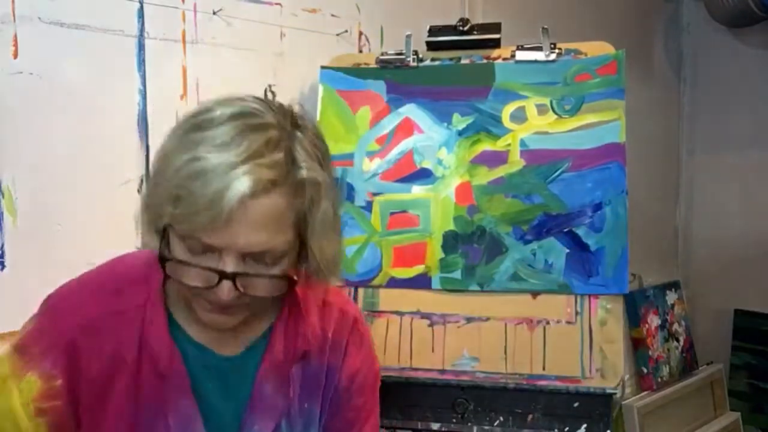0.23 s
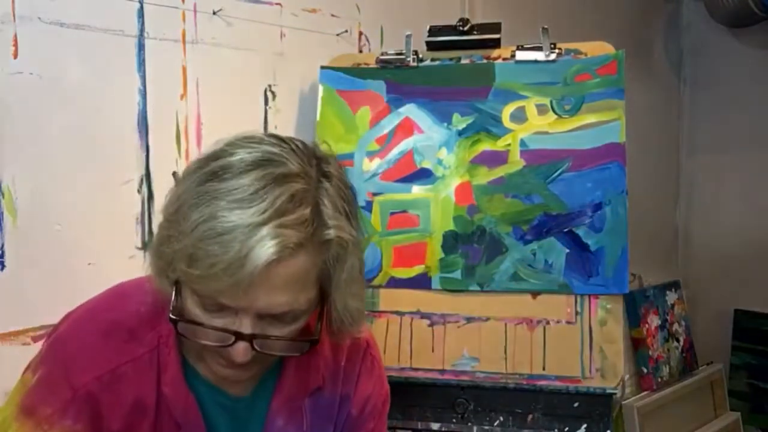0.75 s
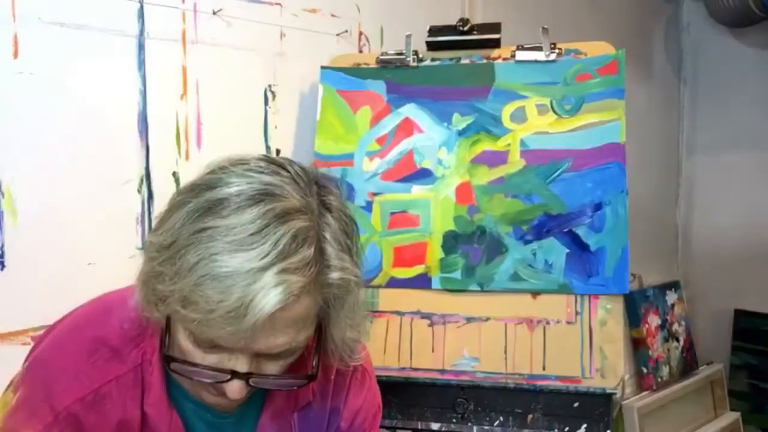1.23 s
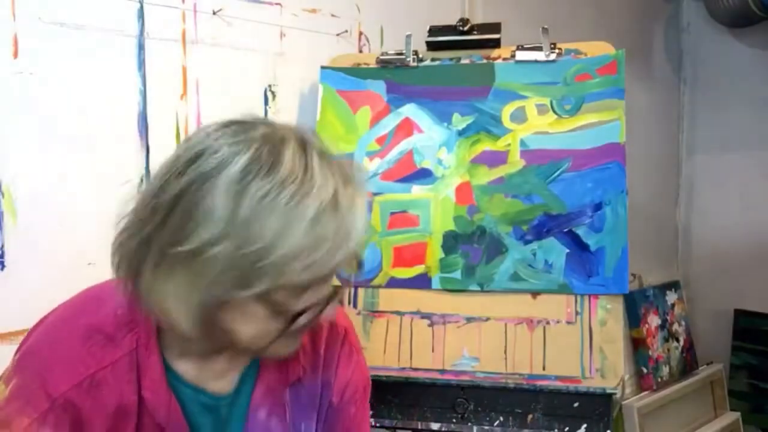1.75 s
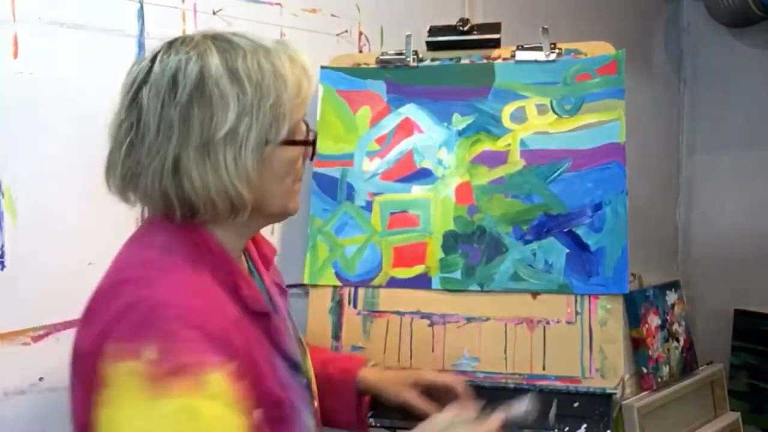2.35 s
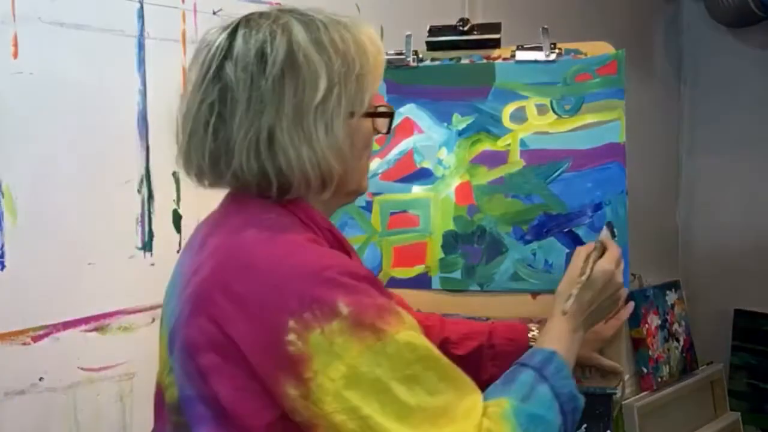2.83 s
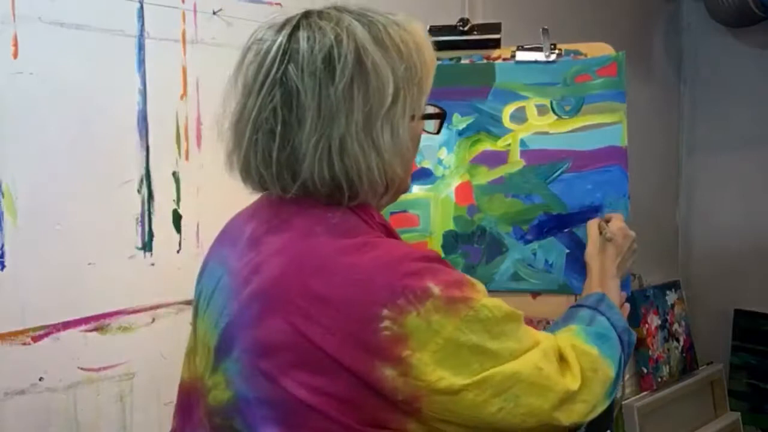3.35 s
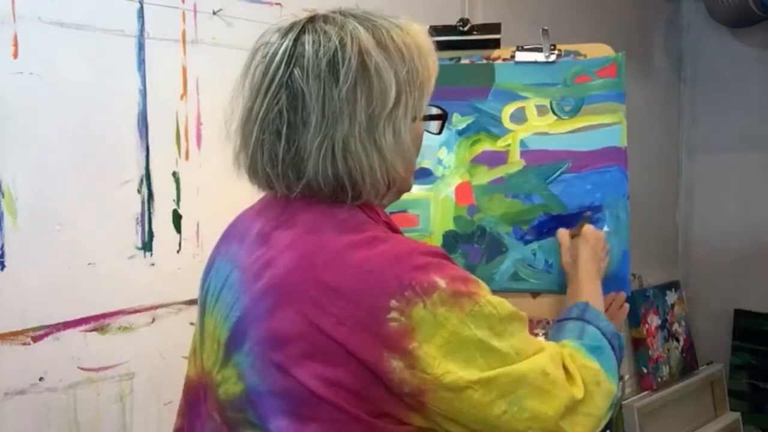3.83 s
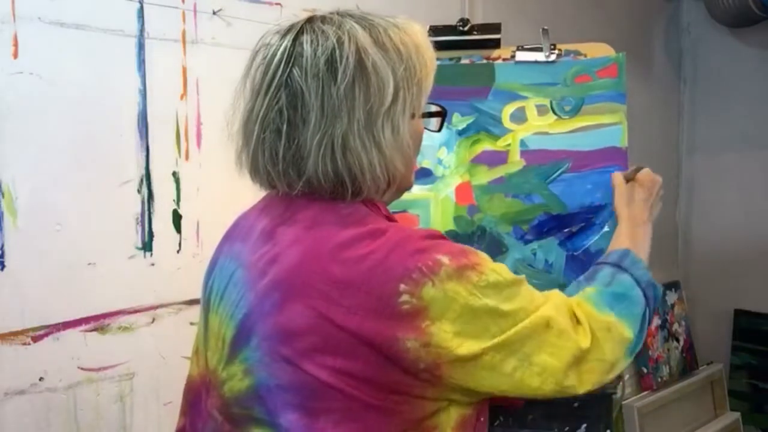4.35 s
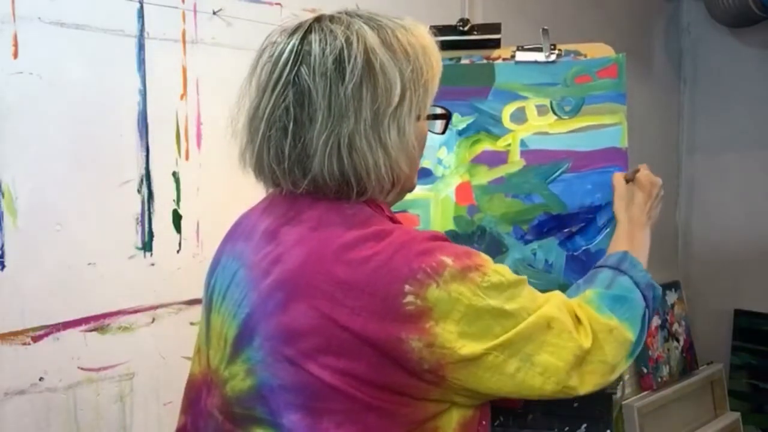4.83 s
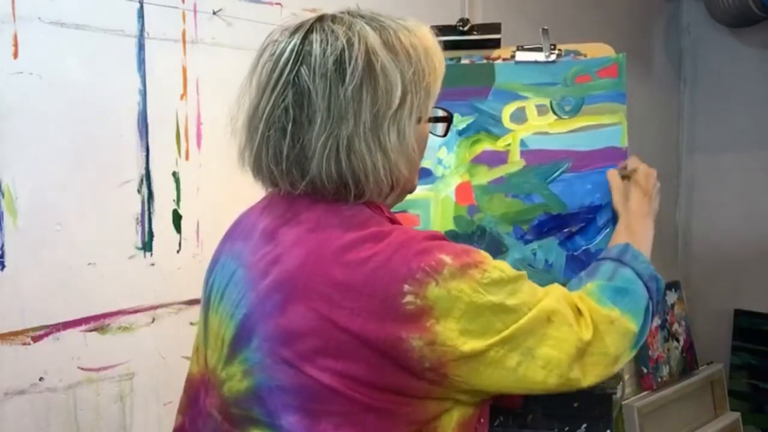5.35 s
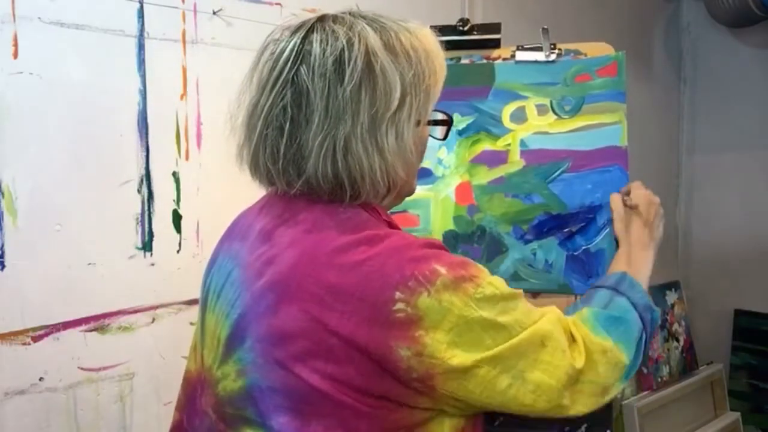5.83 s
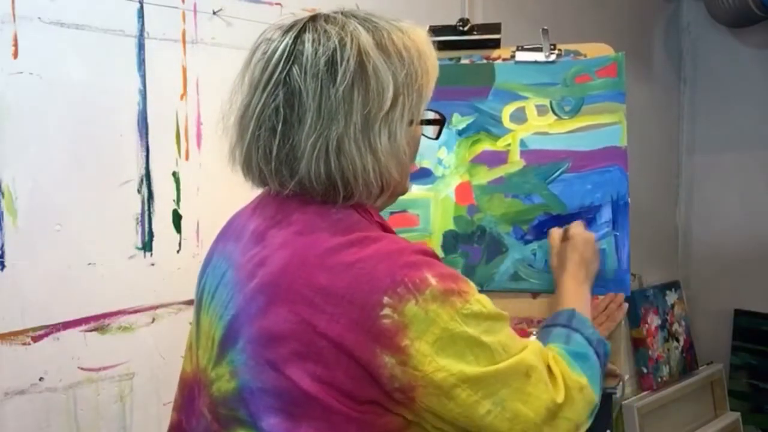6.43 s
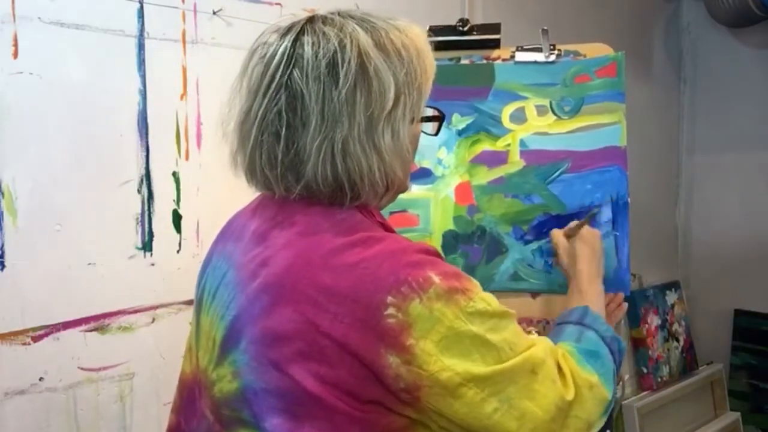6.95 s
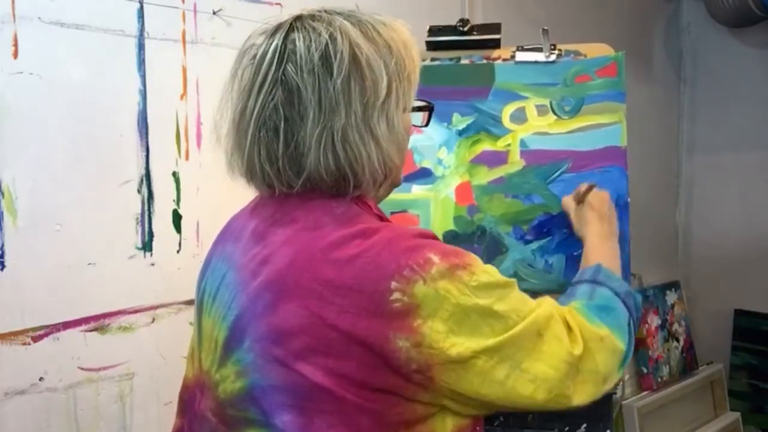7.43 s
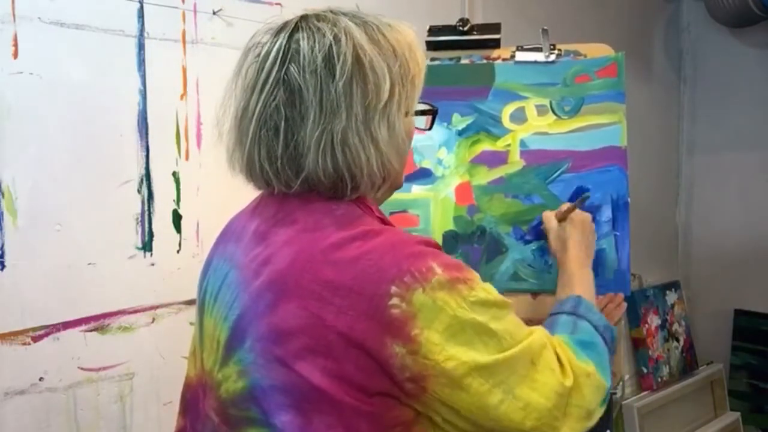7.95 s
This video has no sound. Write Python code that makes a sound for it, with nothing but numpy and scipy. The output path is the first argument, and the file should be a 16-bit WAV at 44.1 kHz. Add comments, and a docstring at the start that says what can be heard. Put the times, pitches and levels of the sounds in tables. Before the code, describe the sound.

A faint cloth rustle, then a loud, sharp clack as a hard tool lands on a table and briefly chatters. A brush scrapes and knocks hollowly on a palette, a sleeve swishes, then a flat brush makes quiet, short hissing strokes on canvas with dull drum-like dabs. Small, dry, quiet room with faint low hum and rumble; close microphone.

```python
"""A flat brush dabs and strokes a stretched canvas, which thumps like a slack drum, in a small quiet studio.
Before that a tool clacks down on the paint table, the brush scrapes and knocks on the palette and a sleeve rustles.
Rubbing is coloured noise made of tiny slips, shaped by hand movements; blows are noise bursts and decaying modes.
A faint mains hum and a low rumble lie underneath."""
import sys
import numpy as np
from scipy import signal
from scipy.fft import rfft, irfft, next_fast_len
from scipy.io import wavfile

SR = 44100
rng = np.random.default_rng(int(sys.argv[2]) if len(sys.argv) > 2 else 0)


def dump(signal):
    """Clip the signal to [-1, 1] and save it as 16-bit WAV at the path in sys.argv[1]."""
    limited = np.clip(np.atleast_2d(signal).T, -1, 1)
    pcm = np.round(limited * 32767).astype(np.int16)
    wavfile.write(sys.argv[1], SR, pcm)


N = 361041
T = np.arange(N) / SR
RING = T[:SR // 2]  # half a second for each blow


def undb(db):
    """Turn dB into an amplitude factor."""
    return 10 ** (np.asarray(db) / 20)


def unit(x):
    """Scale to rms 1."""
    return x / np.sqrt(np.mean(x ** 2))


def fade(t60):
    """Exponential decay that falls 60 dB in t60 seconds."""
    return np.exp(-np.log(1000) * RING / t60)


def colour(x, points):
    """Filter by a spectrum of (Hz, dB) points, joined by lines over log frequency."""
    hz, db = np.transpose(points)
    size = next_fast_len(len(x))
    f = np.maximum(np.arange(size // 2 + 1) * SR / size, 1)
    gain = undb(np.interp(np.log(f), np.log(hz), db))
    return irfft(rfft(x, size) * gain, size)[:len(x)]


def band(x, lo_hz, hi_hz):
    """Band-pass without delay."""
    sos = signal.butter(3, [lo_hz, min(hi_hz, SR / 2 - 1)], "band", fs=SR, output="sos")
    return signal.sosfiltfilt(sos, x)


def add(out, at, sound):
    """Mix a sound in at a time in seconds."""
    start = max(int(at * SR), 0)
    out[start:start + len(sound)] += sound[:N - start]


def ring(modes, scatter_db, rise, favoured_hz=None, slope_db=0):
    """Decaying modes of a struck body, rms 1 before decay; the struck spot favours modes around one pitch."""
    hz, db, t60 = np.transpose(modes)[:, :, None]
    octaves = np.abs(np.log2(hz / favoured_hz)) if favoured_hz else 0
    gain = undb(db - slope_db * octaves + scatter_db * rng.standard_normal(hz.shape))
    cycles = hz * RING + rng.random(hz.shape)
    waves = np.sin(2 * np.pi * cycles) * fade(t60)
    level = np.sqrt(np.sum(gain ** 2) / 2)
    return (gain * waves).sum(0) / level * (1 - np.exp(-RING / rise))


def crack(points, t60, tail_db, tail_t60, tail_hz):
    """Contact noise so dense in modes that it is a fading noise burst, with a duller, longer tail of the room."""
    direct, tail = (unit(colour(rng.standard_normal(len(RING)), points)) for _ in range(2))
    lowpass = signal.butter(2, min(tail_hz, SR / 3), fs=SR, output="sos")
    tail = signal.sosfilt(lowpass, tail)
    return direct * fade(t60) + undb(tail_db) * tail * fade(tail_t60)


def friction(points, slips_per_s, spread_db, flutter_db, flutter_hz):
    """Many tiny slips of unequal size; flutter bunches them as fibres catch and let go."""
    happens = rng.random(N) < slips_per_s / SR
    size = undb(spread_db * np.minimum(rng.exponential(size=N), 5))
    slips = happens * rng.standard_normal(N) * size
    bunches = unit(colour(rng.standard_normal(N), [(flutter_hz, 0), (10 * flutter_hz, -60)]))
    return unit(colour(slips * undb(flutter_db * bunches), points))


def sweeps(rows, speed_power=0.73):
    """Gain of hand movements: speed rises and falls in one arch, and friction grows as a power of it."""
    power = np.zeros(N)
    for start, length, db in rows:
        speed = np.sin(np.pi * np.linspace(0, 1, int(length * SR))).clip(0)
        arch = undb(db) * speed ** speed_power
        already_past = max(int(-start * SR), 0)
        add(power, start, arch[already_past:] ** 2)
    return np.sqrt(power)


def studio(x, wet_db, t60):
    """Close walls return a short, dense echo; the mix is scaled to hold the total power."""
    echo = rng.standard_normal(len(RING)) * fade(t60) * (RING > .003)
    wet = signal.fftconvolve(x, echo / np.sqrt(np.sum(echo ** 2)))[:N]
    return (x + undb(wet_db) * wet) / np.hypot(1, undb(wet_db))


def background():
    """Steady room air is noise weighted to the lows; mains hum is one sine."""
    # Spectrum of the room air. Each row: frequency in Hz, gain in dB.
    air_colour = [(10, -10), (25, 1.5), (45, 5.5), (62, -2.5), (100, -8.5), (170, -12.5), (290, -14),
                  (400, -20.5), (1300, -18), (2100, -20), (2700, -23), (4200, -24.5), (9000, -27),
                  (15500, -29)]
    air_db, hum_db, hum_hz = -62, -70.5, 121
    air = unit(colour(rng.standard_normal(N), air_colour))
    hum = unit(np.sin(2 * np.pi * hum_hz * T))
    return undb(air_db) * air + undb(hum_db) * hum


def rubs():
    """Soft, uneven rustle as the painter moves: slips of cloth, skin and paint in two bands."""
    # Soft rubs of sleeve, hand and paint. Each row: start in seconds, length in seconds,
    # level in dB before the band trims, treble relative to it in dB before the trims.
    moves = [ (-.03, 0.097, -52, -12), (0.058, 0.069, -55, -10), (0.118, 0.046, -60, -12),
             (0.133, 0.36, -66.5, -4), (0.744, 0.27, -57, -9), (0.928, 0.22, -56, -11.5),
             (1.133, .14, -70, -12), (1.337, 0.063, -67.5, -12), (1.417, 0.055, -68, -1.5),
             (1.558, .13, -69, -11), (1.702, 0.1, -64.5, -14), (1.92, 0.45, -68.5, -3.5),
             (2.165, .08, -62.5, -6), (2.52, 0.27, -64.5, -7.5), (2.753, 0.16, -57.5, -9),
             (2.811, 0.12, -57, -8.5), (2.91, 0.2, -63.5, -12.5), ]
    # Spectrum of the rustle. Each row: frequency in Hz, gain in dB.
    rustle_colour = [(120, -7), (300, -4.5), (700, -5.5), (1100, 0), (1600, -1.5), (2300, 0.5),
                     (3200, -5.5), (4200, -7), (5000, -10.5), (6500, -12.5), (10000, -18), (15500, -22.5)]
    body_trim_db, treble_trim_db = -0.5, 0.5
    grain = friction(rustle_colour, slips_per_s=7000, spread_db=-0.4, flutter_db=1.27, flutter_hz=40)
    body_gain = sweeps([(start, length, db) for start, length, db, _ in moves])
    treble_gain = sweeps([(start, length, db + treble_db) for start, length, db, treble_db in moves])
    body = unit(band(grain, 150, 5000)) * body_gain
    treble = unit(band(grain, 5000, 17000)) * treble_gain
    return body * undb(body_trim_db) + treble * undb(treble_trim_db)


def sleeve_swish():
    """One warm swish as the sleeve swings; loose cloth only sounds near full speed."""
    # The sleeve swinging up to the easel and settling. Each row: start in seconds, length in seconds,
    # level in dB before the 1 dB lift.
    swings = [(2.42, 0.11, -47), (2.47, .12, -56)]
    # Spectrum of the moving cloth. Each row: frequency in Hz, gain in dB.
    cloth_colour = [(130, -3.5), (400, -8), (600, -0.5), (1150, 3), (1700, -2), (2300, -3.5), (3200, -8.5),
                    (4200, -10), (6500, -12), (15500, -20)]
    cloth = friction(cloth_colour, slips_per_s=12000, spread_db=0.9, flutter_db=0.8, flutter_hz=60)
    return cloth * sweeps(swings, speed_power=2.3) * undb(1.0)


def clack():
    """A hard tool lands, chatters for an instant and leaves the table ringing."""
    # The tool landing and chattering. Each row: time in seconds, level in dB before the trim.
    blows = [(0.3855, -15.5), (0.388, -12), (0.3928, -15), (0.3956, -14), (0.4037, -18)]
    # What tool and table ring with. Each row: frequency in Hz, gain in dB, t60 in seconds.
    table_modes = [(340, -31, 0.3), (570, -22, 0.17), (1040, -1, .17), (1190, -8, 0.21), (1353, -12, 0.2),
                   (1440, -6, 0.18), (1490, -9.5, 0.2), (1651, -7, .17), (1910, -7.5, .14),
                   (2081, -7.5, .17), (2340, -1.5, 0.17), (2400, -1.5, .14), (2524, -3.5, .13),
                   (2668, -6.5, .19), (2843, -12.5, .18), (3063, -11.5, 0.21), (3391, -15.5, 0.18),
                   (3653, -3, .12), (3715, -0.5, 0.15), (3930, -4.5, 0.17), (4098, 2, 0.13),
                   (4194, -9.5, .16), (4383, -7.5, 0.12), (5380, -14, 0.14), (7241, -22, .12),
                   (9297, -14, .08)]
    # Spectrum of the contact noise. Each row: frequency in Hz, gain in dB.
    blow_colour = [(60, -28), (250, -35), (420, -24), (580, -11), (770, -18), (1050, 1), (1800, -4.5),
                   (2400, 2), (3300, 2), (4100, 2.5), (5000, -7.5), (7000, -14.5), (10000, -19.5),
                   (15500, -30)]
    trim_db, ringing_db, sparkle_db = -3.0, -16.0, -36
    out = np.zeros(N)
    for at, db in blows:
        blow = crack(blow_colour, t60=.04, tail_db=-15, tail_t60=.175, tail_hz=12000)
        add(out, at, undb(db + trim_db) * blow)
    # the treble of the blow lingers briefly between the close walls
    sparkle = unit(band(rng.standard_normal(len(RING)), 5000, 15000)) * fade(0.17)
    ringing = ring(table_modes, scatter_db=2.5, rise=0.0017)
    add(out, blows[0][0], undb(ringing_db) * ringing + undb(sparkle_db) * sparkle)
    return out


def palette():
    """Knocks and stirring excite the palette's modes: a short hollow note or a drone."""
    # Knocks on the palette. Each row: time in seconds, level in dB, tick relative to it in dB,
    # favoured pitch in Hz.
    knocks = [(0.578, -55.5, 1, 900), (0.6796, -37, 1.5, 450), (0.701, -46.5, -6, 390),
              (1.059, -52.5, -9, 400), (1.104, -46, -9.5, 360), (1.801, -60, 4, 900),
              (1.8175, -45, -1, 335), (3.93, -48, -16, 375)]
    # What the palette rings with. Each row: frequency in Hz, gain in dB, t60 in seconds.
    palette_modes = [(122, -5.5, .2), (190, -4, 0.134), (273, -24, 0.1), (337.4, -1.5, 0.2), (378, 4, 0.18),
                     (424.6, -15, .14), (580, -8, 0.098), (764, -17, 0.12), (964, 2, 0.088),
                     (1317, -5, 0.12)]
    # Spectrum of the contact tick. Each row: frequency in Hz, gain in dB.
    knock_colour = [(50, 7), (150, -11), (400, 2), (700, -3), (1050, 1.5), (1600, -5), (2400, -2.5),
                    (3500, -7), (5000, -21), (15500, -44)]
    # The palette droning while paint is stirred on it. Each row: start in seconds, length in seconds,
    # level in dB before the 2 dB cut.
    stirs = [(.8, 0.29, -64), (1.0, .18, -59.5), (1.575, 0.1, -62.5), (1.715, 0.062, -66)]
    out = np.zeros(N)
    for at, db, tick_db, hz in knocks:
        tick = crack(knock_colour, t60=0.082, tail_db=-6.5, tail_t60=0.23, tail_hz=4000)
        note = ring(palette_modes, scatter_db=1.0, rise=0.0029, favoured_hz=hz, slope_db=3.0)
        add(out, at, undb(db) * (note + undb(tick_db) * tick))
    board = ring(palette_modes, scatter_db=3.0, rise=0.0023, favoured_hz=373, slope_db=16)
    drone = unit(signal.fftconvolve(rng.standard_normal(N), board)[:N])
    return out + drone * sweeps(stirs) * undb(-2.0)


def scrapes():
    """The brush swishes through paint on the palette: very dense slips under short arches."""
    # The brush scraping the palette. Each row: start in seconds, length in seconds, level in dB.
    scrape_moves = [(.46, 0.11, -55.5), (.552, 0.058, -42.5), (.585, 0.1, -49), (.643, 0.053, -44.5),
                    (.68, .06, -57), (1.798, .045, -46.5), (1.825, 0.052, -59)]
    # Spectrum of the scrape. Each row: frequency in Hz, gain in dB.
    scrape_colour = [(150, -17), (700, -18), (1050, -7), (1700, -10), (2400, -1.5), (3000, -4.5),
                     (4000, -1), (5000, -10), (6500, -11), (10000, -17), (15500, -22)]
    grain = friction(scrape_colour, slips_per_s=16000, spread_db=2.5, flutter_db=0.3, flutter_hz=70)
    return grain * sweeps(scrape_moves)


def scrub():
    """Pressed flat, the bristles rasp and, at the hardest push, catch in a narrow, high whistle."""
    # Hard scrubs that make the bristles sing. Each row: start in seconds, length in seconds,
    # level in dB before the 2 dB lift of the rasp.
    pushes = [(6.147, 0.087, -52), (6.2, 0.11, -55.5)]
    # Spectrum of the rasp. Each row: frequency in Hz, gain in dB.
    rasp_colour = [(180, -4), (380, -7), (490, 5), (650, -9), (950, -11), (1300, 2.5), (1650, -3.5),
                   (2600, 4), (3400, -3), (4150, 5), (5000, -5.5), (6200, 0), (10000, -3), (15500, -11.5)]
    sing_hz, sing_width_hz, sing_db = 8440, 900, -54.5
    sing_growth = 3  # dB of whistle for each dB of push
    push = sweeps(pushes)
    rasp = friction(rasp_colour, slips_per_s=12000, spread_db=-0.5, flutter_db=0.0, flutter_hz=60)
    noise = rng.standard_normal(N)
    whistle = unit(band(noise, sing_hz - sing_width_hz / 2, sing_hz + sing_width_hz / 2))
    whistle_gain = (push / push.max()) ** sing_growth * undb(sing_db)
    return rasp * push * undb(2.0) + whistle * whistle_gain


def brush():
    """Bristles flick over the weave; strong strokes are mostly bright hiss, weak ones have relatively more body."""
    # Strokes of the brush over the canvas. Each row: start in seconds, length in seconds,
    # bristle hiss in dB before its trim, body of the stroke relative to the hiss in dB before the trims.
    strokes = [(3.461, 0.134, -61.5, -2.0), (3.615, 0.063, -73.0, 5.5), (3.833, 0.087, -62.5, -2),
               (3.898, 0.05, -59.5, -2), (3.987, 0.042, -67, -2), (4.177, 0.159, -67.5, 4),
               (4.296, 0.16, -61.5, -1.5), (4.442, 0.18, -59, -2.0), (4.607, 0.13, -69.5, 0.5),
               (4.773, 0.089, -66, 0.5), (4.854, 0.092, -58.5, -4), (4.919, 0.106, -71.5, 2.5),
               (5.058, 0.16, -64, 1.5), (5.159, 0.16, -65.5, 3), (5.305, 0.11, -64, -3),
               (5.398, 0.093, -57.5, -7.5), (5.515, 0.12, -60.0, -6.0), (5.597, 0.103, -69.5, 6),
               (5.669, 0.087, -67.5, 13), (5.724, 0.06, -62.0, 10), (5.775, 0.105, -60.5, 0),
               (5.926, 0.075, -75.5, 6.5), (6.048, 0.22, -64.5, 0.5), (6.489, 0.09, -64.5, -3.5),
               (6.611, 0.058, -68.5, 3), (6.663, 0.06, -61.0, -5), (6.76, 0.051, -69.5, 8),
               (6.847, 0.082, -64, 0.5), (6.934, 0.09, -65.5, 0.5), (7.042, 0.06, -65.0, 1.5),
               (7.116, 0.13, -76.5, 9), (7.253, 0.141, -62, -2.5), (7.356, 0.088, -59.5, -6),
               (7.46, 0.075, -59, -4.0), (7.526, 0.07, -62.0, -2.5), (7.581, 0.082, -68, 2),
               (7.679, 0.11, -64.5, -2.5), (7.75, 0.141, -60.0, -6), (7.92, 0.075, -63.5, -4.5),
               (7.991, 0.099, -67.0, 2), (8.09, 0.032, -69.5, 9)]
    # Spectrum of bristles on cloth. Each row: frequency in Hz, gain in dB.
    bristle_colour = [(180, -2.5), (290, 6), (400, -10), (495, 3), (620, -5.5), (950, -4.5), (1250, -1.5),
                      (1750, -3), (2600, 3.5), (3400, -4), (4200, 0.5), (4950, -8), (6100, -1.5),
                      (15500, -5.5)]
    hiss_trim_db, body_trim_db = -0.04, -0.8
    grain = friction(bristle_colour, slips_per_s=8000, spread_db=0.5, flutter_db=1.16, flutter_hz=50.3)
    hiss_gain = sweeps([(start, length, db) for start, length, db, _ in strokes])
    body_gain = sweeps([(start, length, db + body_db) for start, length, db, body_db in strokes])
    hiss = unit(band(grain, 4340, 16500)) * hiss_gain
    body = unit(band(grain, 204, 4730)) * body_gain
    return undb(hiss_trim_db) * hiss + undb(body_trim_db) * body


def canvas():
    """Each dab ticks, thumps the modes of the stretched cloth and rocks the low modes of the easel."""
    # Brush meeting the canvas. Each row: time in seconds, level in dB, tick relative to it in dB,
    # favoured pitch in Hz, sway of the easel in dB.
    dabs = [(2.967, -59, -28, 298, -70), (3.4451, -46.5, -14.5, 400, -52), (3.8138, -50.5, -11, 430, -55),
            (3.917, -43, -8, 480, -53), (3.953, -49.5, -10, 330, -50.5), (4.193, -52.5, -7, 208, -59),
            (4.7861, -54.5, -1, 260, -66), (5.0783, -60.5, -17, 280, -60), (5.72, -60, -17, 220, -72),
            (5.845, -65, -14, 100, -50), (6.4208, -50, -13, 200.4, -50.5), (6.783, -64, -10, 180, -50.5),
            (6.812, -58.5, -16, 130, -58), (6.9505, -58.5, -10, 200, -68), (7.04, -61.5, -9, 600, -70),
            (7.129, -61.5, -14, 121, -54), (7.7044, -61.5, -14, 120, -48.5),
            (7.9705, -60.5, -6.5, 300, -68)]
    # What the stretched cloth rings with. Each row: frequency in Hz, gain in dB, t60 in seconds.
    canvas_modes = [(81.6, -11, 0.28), (133.6, -6, 0.3), (206, -1, 0.13), (244, -5, 0.12), (291.7, 1, 0.15),
                    (370, -21, 0.26), (484, -1.5, 0.16), (550, -3, 0.15), (744, -1.5, 0.12),
                    (940, -16, 0.068), (1250, -4, 0.22)]
    # What the easel rings with. Each row: frequency in Hz, gain in dB, t60 in seconds.
    easel_modes = [(47, -5, 0.49), (63.8, -17, 0.31), (74.3, -9, 0.18)]
    # Spectrum of the contact tick. Each row: frequency in Hz, gain in dB.
    tick_colour = [(100, 12.5), (400, 3.5), (700, 4), (1300, -1), (1700, -9), (2400, -0.5), (3500, -15),
                   (5000, -10), (15500, -30)]
    out = np.zeros(N)
    for at, db, tick_db, hz, sway_db in dabs:
        tick = crack(tick_colour, t60=0.14, tail_db=5.0, tail_t60=0.24, tail_hz=3940)
        thump = ring(canvas_modes, scatter_db=1.5, rise=0.0024, favoured_hz=hz, slope_db=9)
        sway = ring(easel_modes, scatter_db=1.5, rise=0.0052)
        add(out, at, undb(db) * (thump + undb(tick_db) * tick))
        add(out, at, undb(sway_db) * sway)
    return out


def scene():
    """Rubbing sounds with the echo of the room, plus the blows and the background."""
    rubbing = rubs() + sleeve_swish() + scrapes() + scrub() + brush()
    rubbing = studio(rubbing, wet_db=-6.5, t60=0.081)
    return (background() + clack() + palette() + rubbing + canvas())[None]


def record(dry):
    """The microphone port colours the treble and the recorder cuts the top."""
    # Notches and peaks of the microphone port. Each row: centre in Hz, width in Hz, gain in dB.
    port = [(4400, 270, 1), (4934, 300, -3.5), (7375, 450, -3), (10470, 430, -3.5)]
    top_hz = 15800
    f = np.arange(1, SR // 2, 20)
    port_db = sum(db * np.exp(-((f - hz) / width) ** 2) for hz, width, db in port)
    heard = colour(dry[0], np.column_stack([f, port_db]))
    lowpass = signal.ellip(10, .1, 70, top_hz, fs=SR, output="sos")
    return signal.sosfilt(lowpass, heard)[None]


dry = scene()
out = record(dry)
dump(out)
```